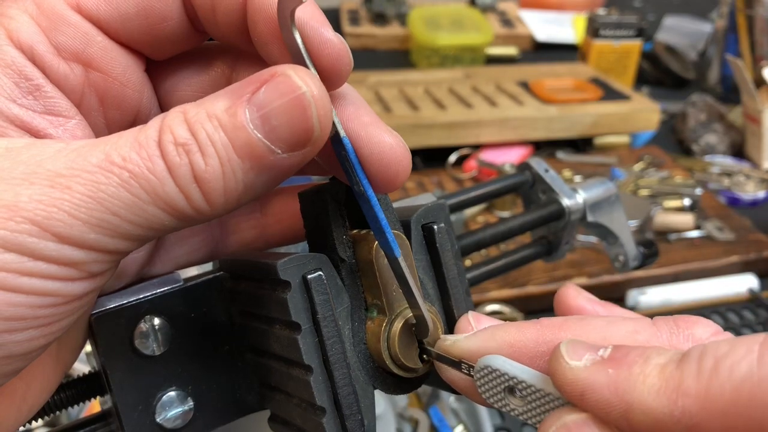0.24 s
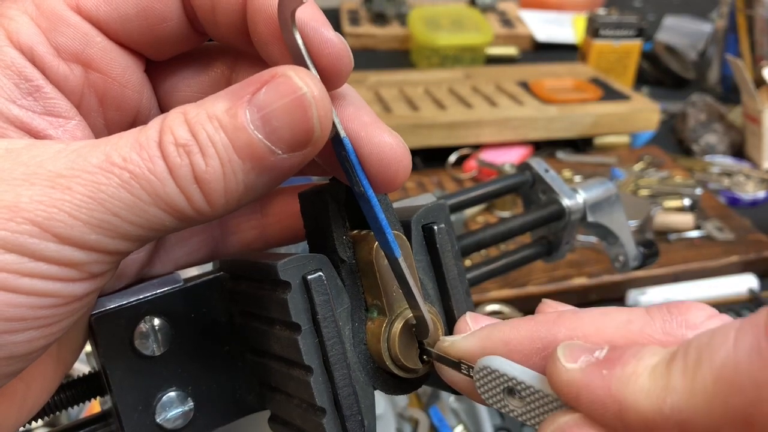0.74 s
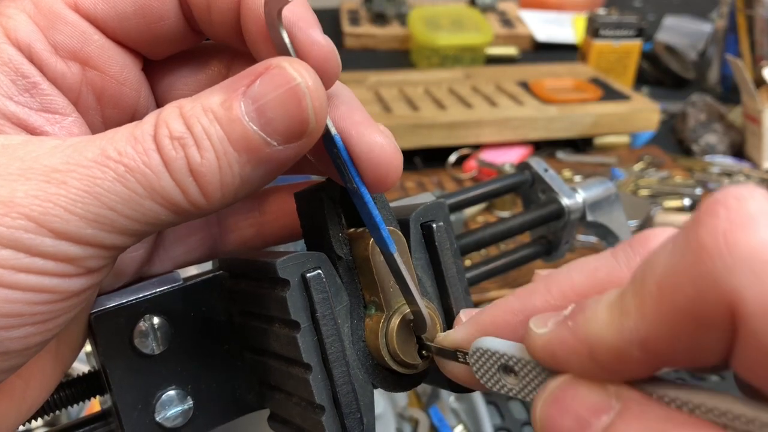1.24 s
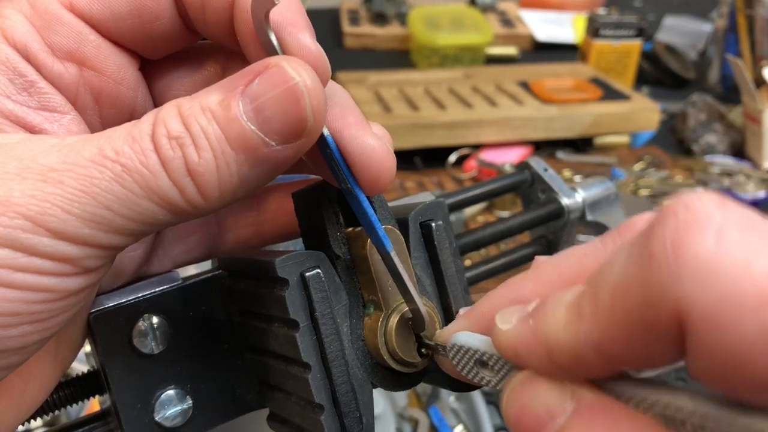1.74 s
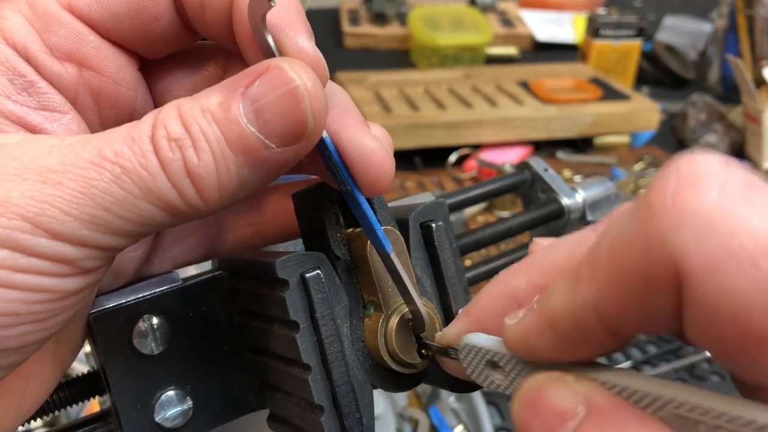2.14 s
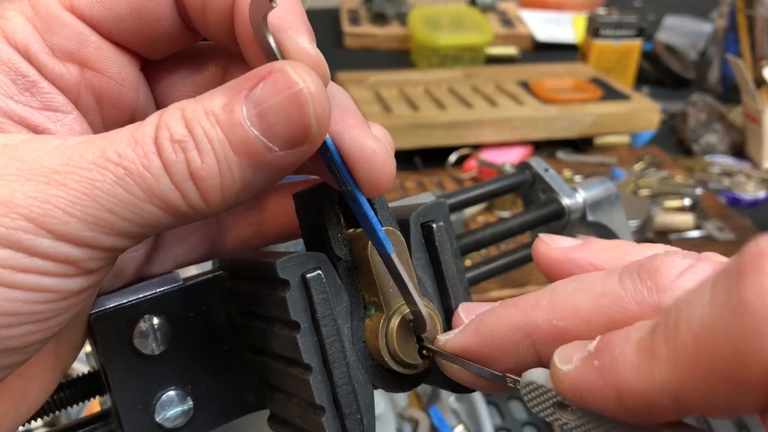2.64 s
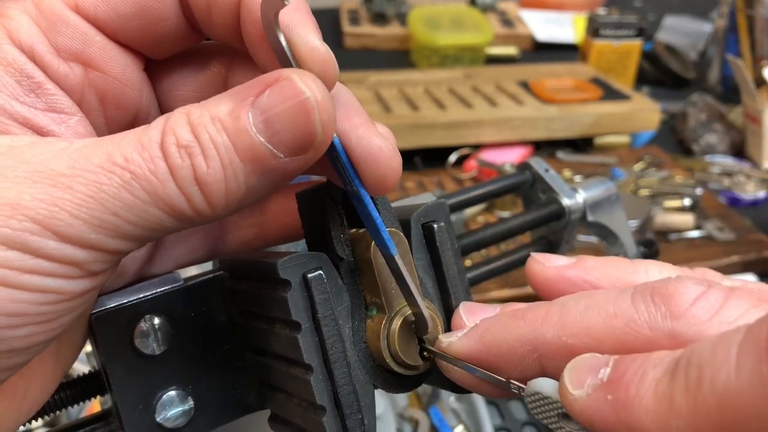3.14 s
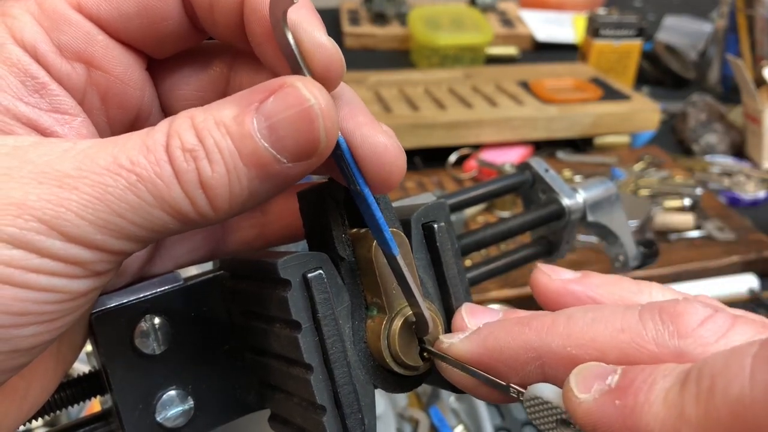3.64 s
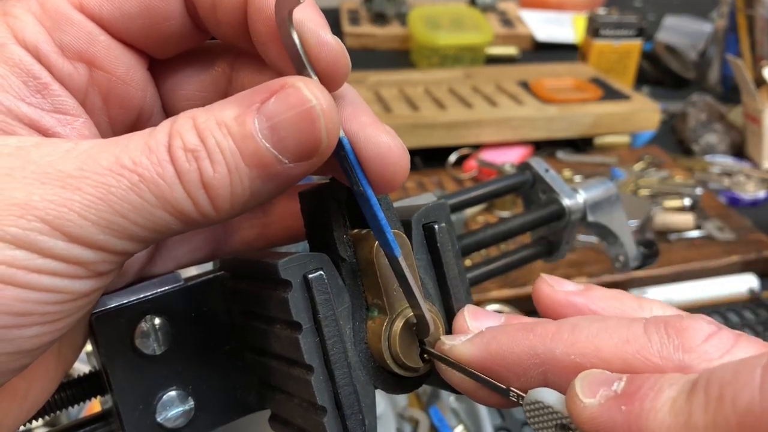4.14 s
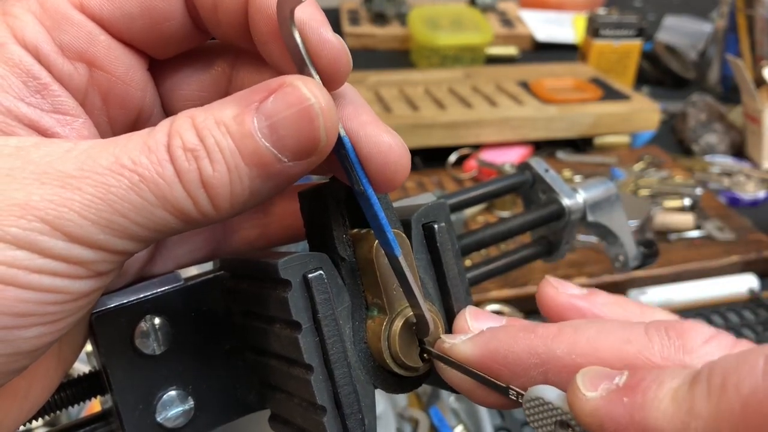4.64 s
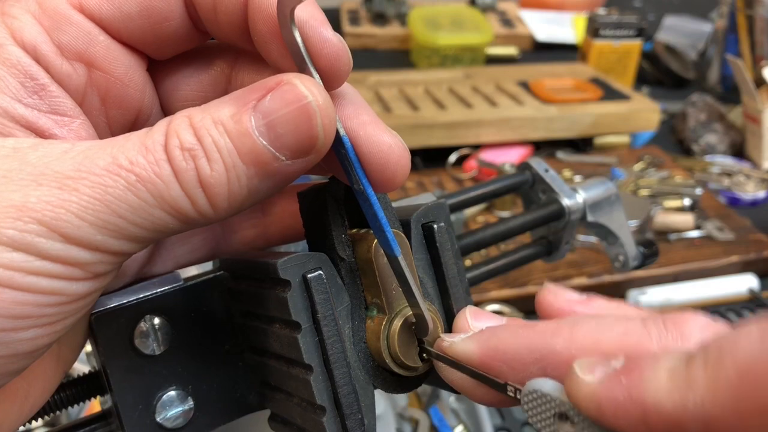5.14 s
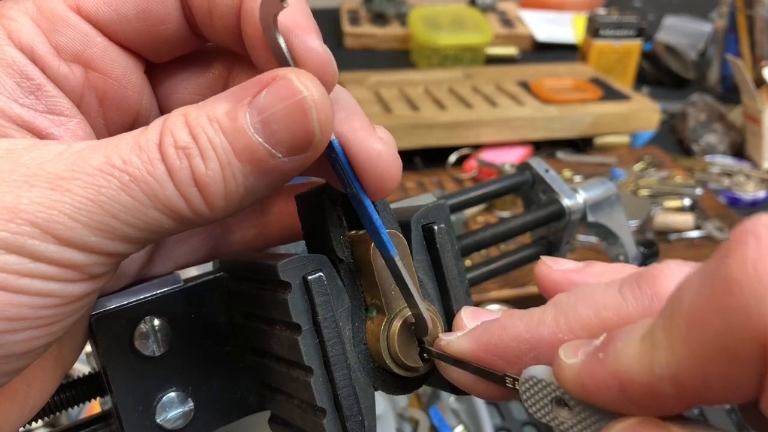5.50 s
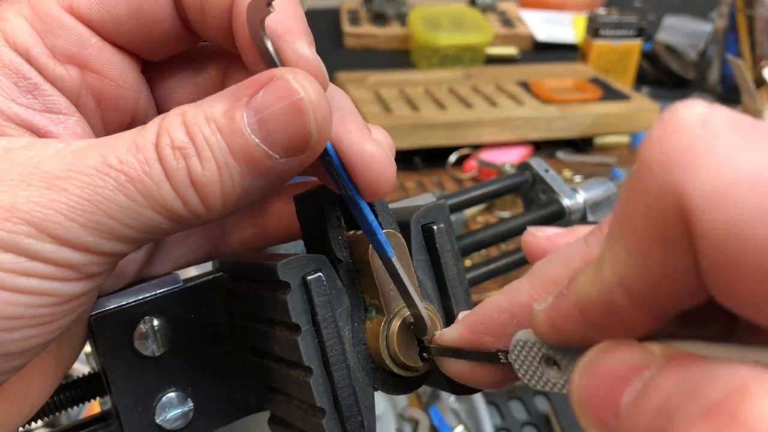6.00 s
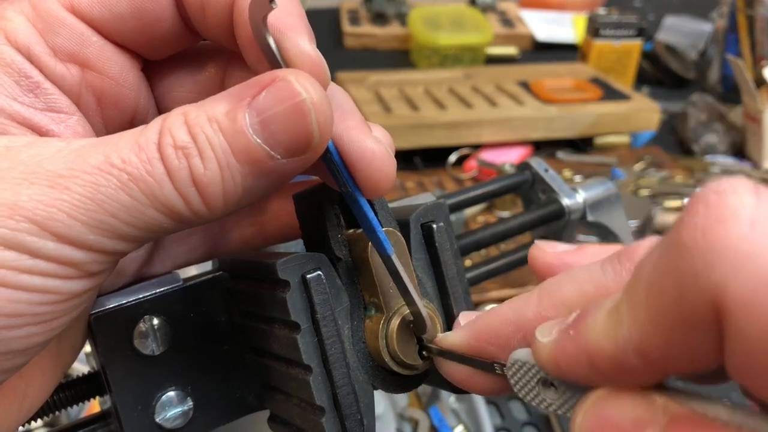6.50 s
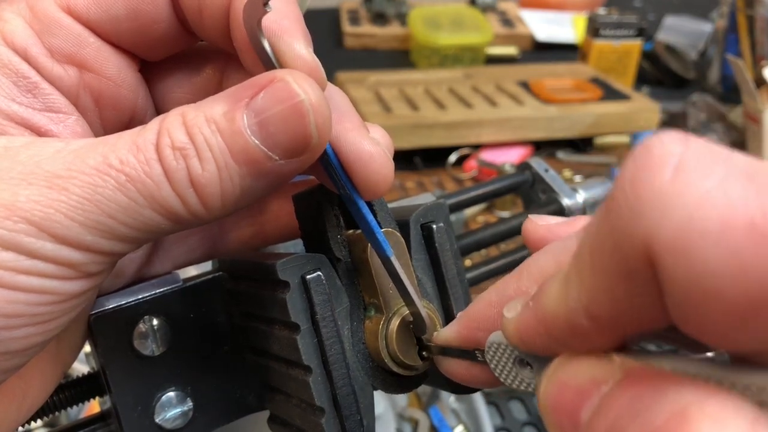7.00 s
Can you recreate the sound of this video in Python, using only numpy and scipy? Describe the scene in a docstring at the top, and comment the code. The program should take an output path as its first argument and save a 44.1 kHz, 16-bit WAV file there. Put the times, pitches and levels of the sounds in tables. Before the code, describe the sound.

Very close in a small quiet workshop, a steel pick works a brass lock held in a vise. Faint ticks, finger rubs and thin scrapes lead to a bright double snap around two and a half seconds. A near-silent pause follows, then two crisp hard snaps, scattered lighter clicks, and finally the loudest metallic clack with a low vise thud, trailing into tiny ticks. Low bench rumble and soft air hiss lie beneath.

```python
"""In a small quiet workshop, a steel hook pick works the pins of a brass cylinder lock in a bench vise, close by.
Pins snap and tick: each contact is a crack, a dense noise ring and decaying modes in six frequency registers.
The pick slides along the keyway and fingers rub the tools: coloured noise of tiny slips, swelling and dying away.
Jolts push, sway and ring the vise; the bench rumbles and the air hisses as coloured noise.
A decaying-noise response adds the room to the lock."""
import sys
import numpy as np
from scipy import signal
from scipy.fft import rfft, irfft
from scipy.io import wavfile

SR = 44100
rng = np.random.default_rng(int(sys.argv[2]) if len(sys.argv) > 2 else 0)


def persist_wave(psi):
    """Save psi, clipped to +-1, as 16-bit WAV."""
    counts = np.round(np.clip(psi, -1, 1) * 32767).astype(np.int16)
    wavfile.write(sys.argv[1], SR, np.atleast_2d(counts).T)


N = 320166
TIME = np.arange(N) / SR  # s
CUTOFF_HZ = 16900

# modes of vise, lock and tools together, from low to high: [f/Hz, relative level/dB, t60/s]
LOCK_MODES = [(160, -1, .09), (216, 0, .1), (550, 0, .03), (745, -2, .035), (820, -4, .04),
              (1050, -2, .055), (1400, -3, .03), (1530, 2, .05), (2050, -5, .03), (2340, -6, .03),
              (2950, -7.5, .04), (3450, -2, .01), (3915, 3, .018), (4220, -2, .016), (4520, -1, .012),
              (5900, -7, .05), (6450, -2, .014), (7220, -5, .015), (7770, -3, .014), (8800, 0, .01),
              (9430, 0, .018), (10380, 0, .016), (10770, -5, .026), (11420, -3, .024), (12080, 0, .014),
              (12830, -1, .018), (13390, -2, .018), (13710, 1, .016), (14390, -1, .014), (14980, -4, .014)]
# edges of the six registers (thud, vise, brass, pin, steel, sparkle): [low f/Hz, high f/Hz]
REGISTER_EDGES = [(120, 250), (500, 2500), (3150, 4900), (6100, 9600), (9600, 12600), (12600, 16000)]
# low jolts of the vise, from hard snaps and light finger bumps:
# [t/s, rise time of push/s, push peak level/dB, jaw knock level/dB]
VISE_JOLTS = [(1.1856, .0008, -61, -46.5), (2.4733, .0006, -45.5, -54), (4.7977, 0.00053, -61, -41),
              (4.8608, 0.00045, -46, -34.5), (5.337, 0.0018, -52, -54.5), (5.627, 0.0023, -45, -72.5),
              (5.789, .0027, -46, -69), (6.0127, 0.0014, -31.5, -50), (6.33, .00065, -28, -39.5),
              (6.3794, 0.00051, -14.5, -32)]


def from_db(db):
    """Level to amplitude: 20 dB is a factor of ten."""
    return 10 ** (np.asarray(db) / 20)


def unit_energy(x):
    """Energy normalisation: the squares sum to one."""
    return x / np.sqrt(np.sum(x ** 2) + 1e-20)


def at_hz(points, hz):
    """Linear interpolation of a table on a log-frequency axis."""
    f, value = np.transpose(points)
    return np.interp(np.log(np.maximum(hz, 1)), np.log(f), value)


def band(x, low_hz, high_hz):
    """Causal band-pass filtering: no output precedes its input."""
    sos = signal.butter(3, [low_hz, min(high_hz, .45 * SR)], "band", fs=SR, output="sos")
    return signal.sosfilt(sos, x)


def fade(t, t60):
    """Exponential free decay: 60 dB down after t60."""
    return np.exp(-np.log(1000) * t / t60)


def coloured(x, spectrum):
    """Spectral shaping: a steady noise takes the table's spectrum, nothing beyond its ends, at rms 1."""
    hz = np.fft.rfftfreq(N, 1 / SR)
    inside = (hz >= spectrum[0][0]) & (hz <= spectrum[-1][0])
    shaped = irfft(rfft(x) * from_db(at_hz(spectrum, hz)) * inside, N)
    return unit_energy(shaped) * np.sqrt(N)


def friction(per_s, spread_db):
    """Stick-slip friction: tiny slips at random moments, of uneven size."""
    sizes = from_db(spread_db * np.minimum(rng.exponential(1, N), 4))
    slips = rng.random(N) < per_s / SR
    return slips * sizes * rng.standard_normal(N)


def swell(peak_s, rise_s, fall_s, depth_db):
    """Amplitude envelope of a movement: it gathers speed, peaks and dies away."""
    away = np.maximum((peak_s - TIME) / rise_s, (TIME - peak_s) / fall_s)
    return from_db(-depth_db * np.abs(away) ** 1.5)


def ringing(modes, t):
    """Modal superposition: decaying sines struck together, with alternating sign."""
    out = np.zeros(len(t))
    for k, (hz, db, t60) in enumerate(modes):
        out += (-1) ** k * from_db(db) * np.sin(2 * np.pi * hz * t) * fade(t, t60)
    return out


def still_air():
    """Stationary broadband noise: the still air of the workshop."""
    # spectrum of the air: [f/Hz, relative spectral density level/dB]
    air_spectrum = [(60, -2.5), (120, -0.5), (180, -7), (245, -8.5), (330, -14), (600, -19), (1200, -23),
                    (5000, -26.5), (10000, -27), (15800, -32.5)]
    return from_db(-70) * coloured(rng.standard_normal(N), air_spectrum)


def bench():
    """Forced low-frequency vibration: hand tremor makes the bench rumble, and each jolt shakes it briefly."""
    # spectrum of the rumble: [f/Hz, relative spectral density level/dB]
    rumble_spectrum = [(9, 4), (16, -2), (24, -11), (35, -16.5), (52, -23), (80, -30.5), (105, -31),
                       (160, -43.5)]
    tremor_db = -52.5
    # the hands hold still to feel a pin
    still_from_s, still_to_s, still_drop_db, settle_s = 2.7, 5.2, 4.5, .3
    shake_db, shake_t60_s = -9.5, 0.17  # shake level is re the push
    still = np.clip(np.minimum(TIME - still_from_s, still_to_s - TIME) / settle_s, 0, 1)
    level = from_db(tremor_db - still_drop_db * still)
    for s, _, push_db, _ in VISE_JOLTS:
        decay = (TIME > s) * fade(np.abs(TIME - s), shake_t60_s)
        level = level + from_db(push_db + shake_db) * decay
    return level * coloured(rng.standard_normal(N), rumble_spectrum)


def fingers():
    """Skin friction: creeping on the handles gives a dull, grainy rub that follows each movement."""
    # fingers shift on the tools: [t of firmest grip/s, rise/s, fall/s, peak level/dB]
    grip_shifts = [(.03, .04, 0.14, -69), (1.02, .14, 0.23, -65), (1.33, 0.22, 0.32, -64),
                   (1.78, 0.066, 0.093, -59.5), (2.35, 0.38, 0.22, -64.5), (2.581, 0.054, 0.14, -66),
                   (4.549, 0.082, .2, -70.5), (4.929, .1, 0.17, -71.5), (5.8, 0.078, 0.069, -63.5),
                   (6.17, .2, 0.2, -66.5), (6.581, 0.14, 0.25, -67), (7.149, 0.17, 0.29, -72)]
    # spectrum of the rub: [f/Hz, relative spectral density level/dB]
    rub_spectrum = [(41, -26), (70, -3), (171, -3), (368, -14), (419, -10.5), (646, -23.5), (1020, -26),
                    (1330, -28.5), (2200, -32), (2860, -60), (4840, -120)]
    rub = coloured(friction(per_s=1200, spread_db=0.5), rub_spectrum)
    level = np.zeros(N)
    for s, rise_s, fall_s, db in grip_shifts:
        # 11 dB weaker at the ends of its rise and fall
        level += from_db(db) * swell(s, rise_s, fall_s, depth_db=11)
    return rub * level


def jolts(sway_hz, sway_t60):
    """Impulse response of the vise: a one-sided push sways and booms it in proportion, and the jaws knock."""
    # the hollow knock of the vise jaws: [f/Hz, relative level/dB, t60/s]
    jaw_modes = [(432.7, -1.5, 0.068), (540, -4.5, 0.018)]
    sway_db, boom_db = -17, -19  # re the push
    out = np.zeros(N + SR)
    t = np.arange(SR) / SR
    sway = from_db(sway_db) * np.sin(2 * np.pi * sway_hz * t) * fade(t, sway_t60)
    boom = from_db(boom_db) * ringing(LOCK_MODES[:2], t)  # the two lowest modes
    knock = ringing(jaw_modes, t)
    for s, push_s, push_db, knock_db in VISE_JOLTS:
        push = t / push_s * np.exp(1 - t / push_s)  # peaks at 1 after push_s
        start = round(s * SR)
        out[start:start + SR] += from_db(push_db) * (push + sway + boom) + from_db(knock_db) * knock
    return out[:N]


def sliding_pick():
    """Stick-slip of steel on brass: a low rasp from the lock, a bright hiss from the blade."""
    # strokes along the keyway: [t of fastest motion/s, rise/s, fall/s, brass rasp level/dB, steel hiss level/dB]
    strokes = [(.492, 0.036, 0.097, -69.5, -66.5), (1.025, 0.031, 0.033, -73, -71.5),
               (1.73, 0.0073, 0.017, -73, -74), (1.82, .11, 0.086, -69, -75.5),
               (2.19, 0.084, 0.085, -73, -65.5), (2.288, 0.065, 0.051, -67, -60.5),
               (2.42, 0.075, 0.26, -71.5, -66), (2.595, 0.019, 0.039, -70, -69.5),
               (6.61, 0.052, 0.11, -78, -72), (6.782, 0.088, 0.068, -83.5, -82)]
    # spectra of rasp and hiss: [f/Hz, relative spectral density level/dB]
    rasp_spectrum = [(1500, 0), (2700, -20), (3400, -2.5), (3950, 1.5), (4600, -2.5), (5300, -18),
                     (6300, -0.5), (7300, -11.5), (9000, -10)]
    hiss_spectrum = [(2940, -41), (5000, -7.5), (5650, -7.5), (7340, 0), (8330, -4), (10200, 3),
                     (16000, -3)]
    rasp = coloured(friction(per_s=1500, spread_db=-0.5), rasp_spectrum)
    hiss = coloured(friction(per_s=17000, spread_db=4.5), hiss_spectrum)
    out = np.zeros(N)
    for s, rise_s, fall_s, rasp_db, hiss_db in strokes:
        # 18 dB weaker at the ends of its rise and fall
        motion = swell(s, rise_s, fall_s, depth_db=18)
        out += motion * (from_db(rasp_db) * rasp + from_db(hiss_db) * hiss)
    # the tip catches and frees itself on the wards: the level wavers at random
    catches = np.arange(0, TIME[-1], .006)
    waver_db = 2.0 * np.interp(TIME, catches, rng.standard_normal(len(catches)))
    return out * from_db(waver_db)


def register_levels(strength_db, brightness_db, body_db):
    """Energy sharing: brightness tilts the small metal parts; the vise takes its share and thuds the bench."""
    # brass, pin, steel and sparkle registers: [level re strength/dB, tilt/(dB per dB of brightness)]
    click_colour = [(-2, -1.0), (-.5, 0), (3, .5), (-1.5, 1.18)]
    # at the knee the bench thuds as loudly as the vise rings; growth is in dB per dB
    thud_knee_db, thud_growth = -57.5, .55
    offset_db, tilt = np.transpose(click_colour)
    vise_db = strength_db + body_db
    thud_db = thud_knee_db + thud_growth * (vise_db - thud_knee_db)
    small_parts_db = strength_db + offset_db + tilt * brightness_db
    return [thud_db, vise_db, *small_parts_db]


def register_edges(brightness_db):
    """Spectral shift: a dull click's crack and dense ring lie lower in the brass; other registers stay put."""
    thud, vise, brass, *small_parts = REGISTER_EDGES
    octaves = 0.07 * min(brightness_db, 0)
    return [thud, vise, np.multiply(brass, 2 ** octaves), *small_parts]


def snap(levels_db, edges, contact_s, chatter_db, spread_db):
    """Impact excitation: one contact gives a crack, a dense metallic ring and modes of scattered strength."""
    # the six registers, from thud to sparkle: [dense ring t60/s, dense ring level re crack/dB, modes level re crack/dB]
    registers = [(0.26, -3, 6), (.035, 0, -5.5), (0.015, -8.5, -4.5), (.014, 4.5, -4), (0.01057, 1, -6.5),
                 (0.036, -2, -8)]
    energy_s = .01  # register levels are rms over this time
    t = np.arange(int(SR / 5)) / SR
    hz, mode_db, t60 = np.transpose(LOCK_MODES)
    strength = from_db(mode_db + spread_db * rng.standard_normal(len(hz))) * (-1) ** np.arange(len(hz))
    amplitude = strength / np.sqrt(t60)  # long and short modes get comparable energy
    modes = amplitude[:, None] * np.sin(2 * np.pi * hz[:, None] * t) * fade(t, t60[:, None])
    register_of_mode = np.searchsorted([high for low, high in REGISTER_EDGES], hz)
    # the pin chatters as it breaks loose, too fast for the heavy vise to follow
    grating = rng.standard_normal(len(t)) * np.sqrt(t) * np.exp(-t / contact_s)
    chatter = band(grating, 3200, CUTOFF_HZ)
    contact = (t == 0) + from_db(chatter_db) * unit_energy(chatter)
    out = np.zeros(len(t))
    for k, (ring_t60, ring_db, modes_db) in enumerate(registers):
        crack = unit_energy(band(contact, *edges[k]))
        dense = unit_energy(band(rng.standard_normal(len(t)) * fade(t, ring_t60), *edges[k]))
        tones = unit_energy(modes[register_of_mode == k].sum(axis=0))
        blend = crack + from_db(ring_db) * dense + from_db(modes_db) * tones
        out += from_db(levels_db[k]) * unit_energy(blend)
    return out * np.sqrt(energy_s * SR)


def pins(drag_per_db, hard_db):
    """Contact duration against force: hard snaps break loose at once, lighter ticks drag on longer."""
    # pin and pick clicks: [t/s, strength level/dB, brightness/dB, body level re strength/dB]
    # body is how much of the blow reaches the vise
    clicks = [(0.0665, -71.5, 0, -7), (1.1853, -59.5, -5.5, -1.5), (1.2032, -58.5, 3, -5),
              (1.3427, -76.5, -2, -6), (1.3658, -65, -6, -22.5), (1.392, -71, -1, -8),
              (1.8363, -74.5, -8, 7.5), (1.8406, -68.5, -6, -6), (2.0925, -68, 0.5, -7),
              (2.1382, -73, -3, -3), (2.2304, -55, 1, -8), (2.3186, -61.5, 4, -11), (2.386, -65, 1, -19),
              (2.401, -70, 0, -11), (2.4125, -48, 2, -14), (2.4458, -50.5, -3, -17.5),
              (2.4713, -38, 7.5, -19.5), (2.473, -33, 7, -28), (2.4787, -52, 6, -5.5),
              (2.5982, -72.5, -10.5, 0), (4.7973, -28.5, 3.5, -21.5), (4.8569, -47.5, 8, -21),
              (4.8595, -29.5, 5.5, -14), (5.1887, -74, -4, -13), (5.3372, -42.5, -8.5, -2.5),
              (5.694, -55, 3.5, -23), (5.759, -73, 4, -18), (5.766, -61.5, -2.5, -16),
              (5.791, -74.5, -4, -3), (6.011, -44, -4, -7), (6.0803, -73.5, -3.5, -9), (6.33, -40, -2, 4),
              (6.38, -21.5, 4, -6.5), (6.3835, -25.5, -2, -14), (6.386, -35.5, 4.5, -4.5), (6.4, -53, 3, 2),
              (6.428, -56, -9, -11), (6.586, -61, 1, -15), (6.601, -64.5, 3, -8), (6.647, -69, 1, -6.5),
              (6.6649, -56.5, 3, -12.5), (6.8254, -78, 2, 3.5), (7.074, -69, 1.5, -13.5),
              (7.1087, -69.5, 2.5, -20)]
    shortest_contact_s = .00013
    out = np.zeros(N + SR)
    for s, strength_db, brightness_db, body_db in clicks:
        levels_db = register_levels(strength_db, brightness_db, body_db)
        softness_db = max(hard_db - max(levels_db), 0)
        contact_s = shortest_contact_s * from_db(drag_per_db * softness_db)
        edges = register_edges(brightness_db)
        sound = snap(levels_db, edges, contact_s, chatter_db=5.0, spread_db=3.5)
        start = round(s * SR)
        out[start:start + len(sound)] += sound
    return out[:N]


def workshop(x, near_db, near_t60, near_delay_s, tail_db):
    """Reverberation by convolution: hands and bench scatter the sound; the walls add a short diffuse tail."""
    # colour of the tail: [f/Hz, relative level/dB]
    room_colour = [(100, -0.5), (500, -8), (2000, -7), (5000, -4.5), (8000, 4.5), (11000, -2), (15500, -4)]
    # decay of the tail: [f/Hz, t60/s]
    room_t60 = [(200, 0.47), (3000, 0.19), (10000, 0.059), (16000, .18)]
    t = np.arange(SR // 2) / SR
    edges = np.geomspace(60, 16000, 13)  # Hz
    tail = np.zeros(len(t))
    for low, high in zip(edges, edges[1:]):
        hz = np.sqrt(low * high)
        noise = band(rng.standard_normal(len(t)), low, high)
        tail += noise * from_db(at_hz(room_colour, hz)) * fade(t, at_hz(room_t60, hz))
    tail *= np.clip(t / 0.0051, 0, 1)  # builds up over 5.1 ms
    near = rng.standard_normal(len(t)) * fade(t, near_t60) * (t > near_delay_s)
    response = from_db(near_db) * unit_energy(near) + from_db(tail_db) * unit_energy(tail)
    return signal.fftconvolve(x, response)[:N]


def scene():
    """Linear superposition: the lock and its room sound, over the noises of vise, hands, bench and air."""
    background = still_air() + bench() + fingers() + jolts(sway_hz=26, sway_t60=0.3)
    lock = sliding_pick() + pins(drag_per_db=0.72, hard_db=-27.5)
    room = workshop(lock, near_db=-24.5, near_t60=0.063, near_delay_s=0.01, tail_db=-21.0)
    return (background + lock + room)[None]


def record(dry):
    """Soft saturation and low-pass filtering: the hardest snaps are rounded off, and the top is cut."""
    top = 1.15  # amplitude that the rounding never exceeds
    rounded = top * np.tanh(dry / top)
    low_pass = signal.cheby2(16, 70, CUTOFF_HZ + 500, fs=SR, output="sos")
    return signal.sosfilt(low_pass, rounded)


dry = scene()
out = record(dry)
persist_wave(out)
```